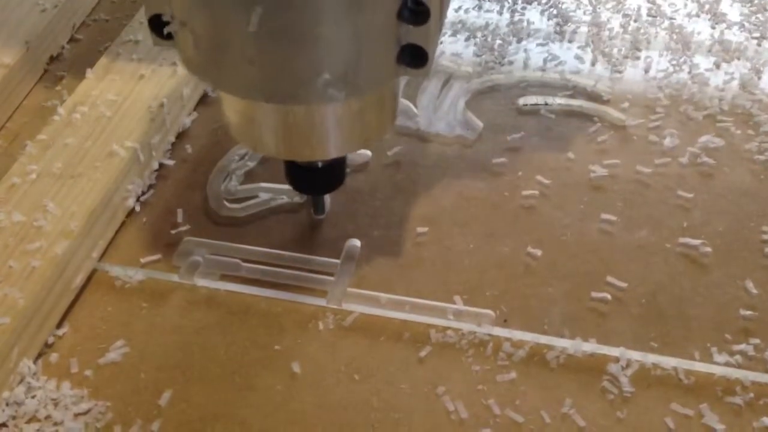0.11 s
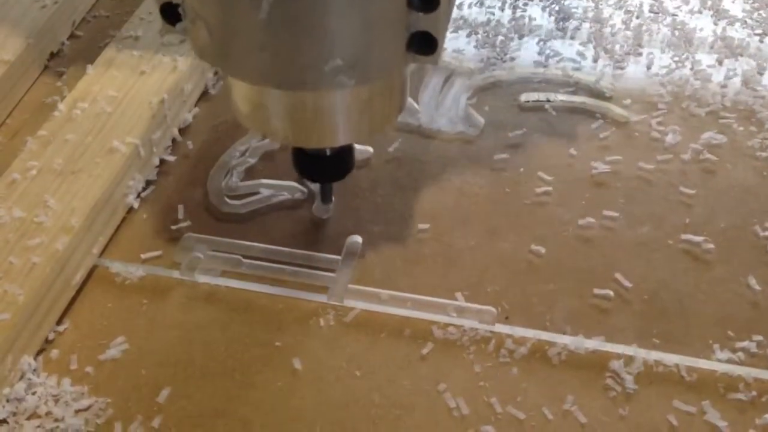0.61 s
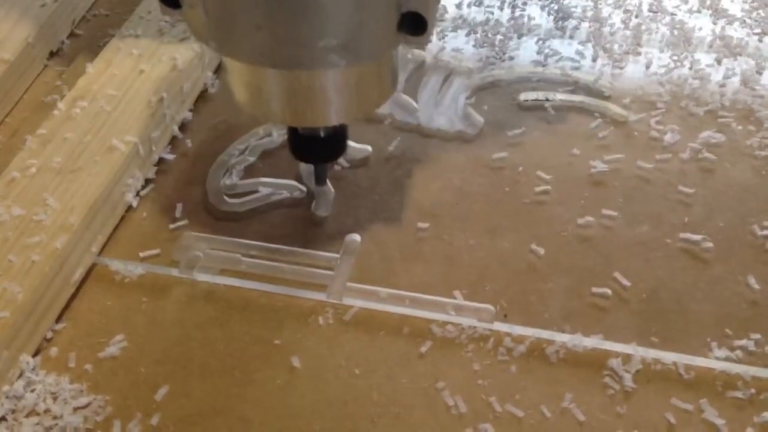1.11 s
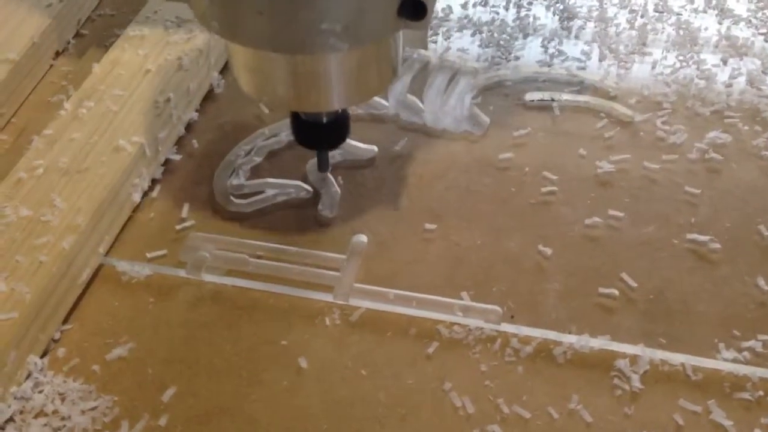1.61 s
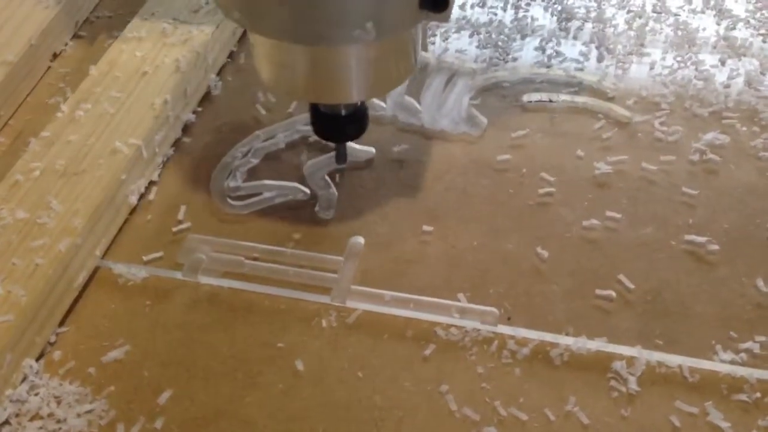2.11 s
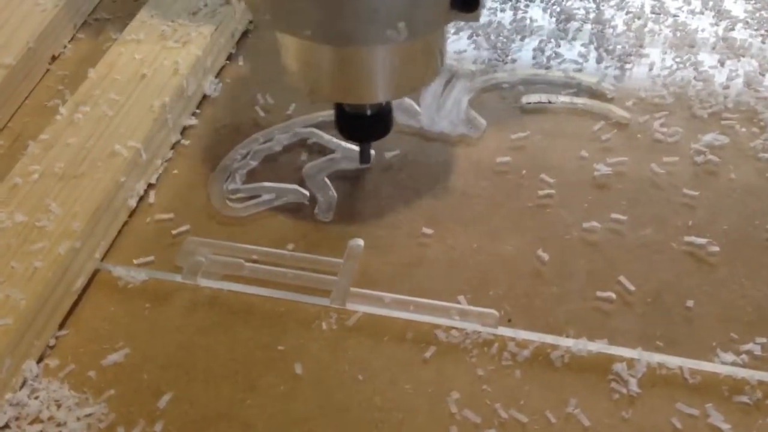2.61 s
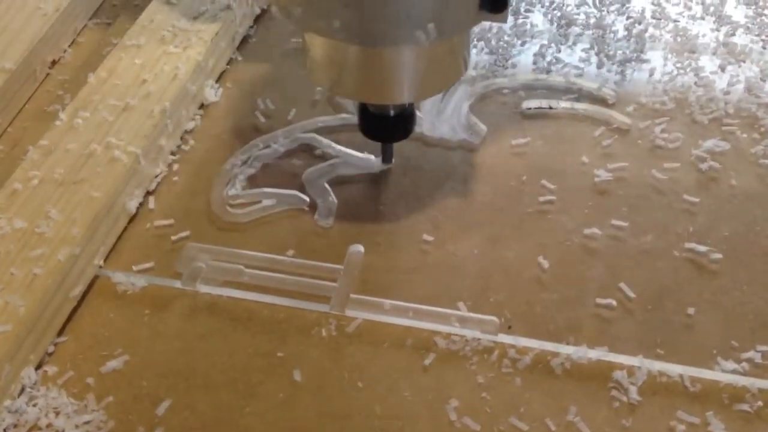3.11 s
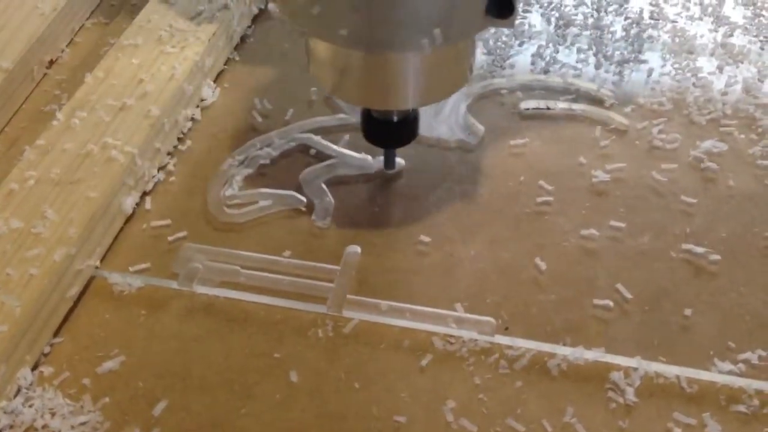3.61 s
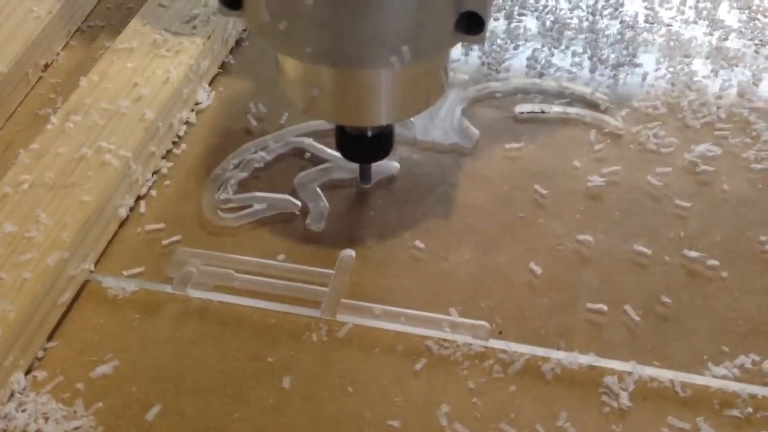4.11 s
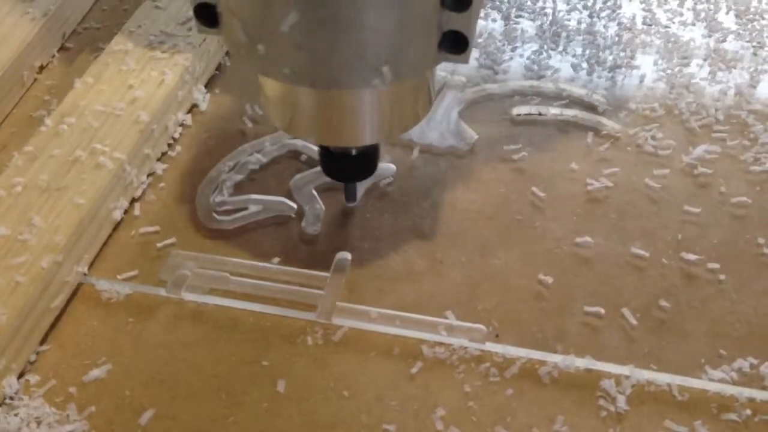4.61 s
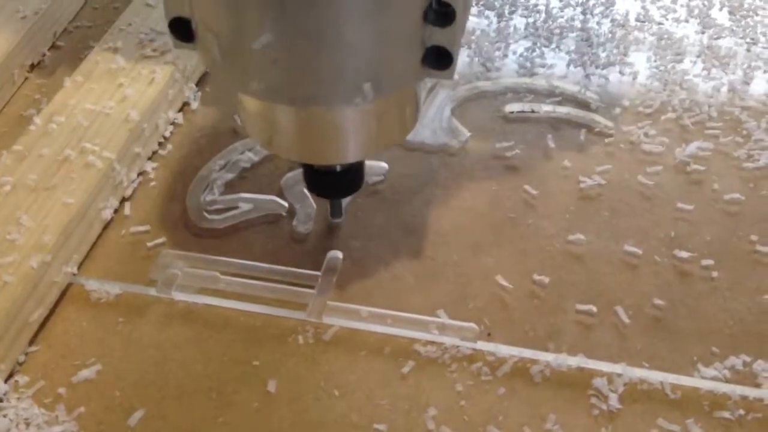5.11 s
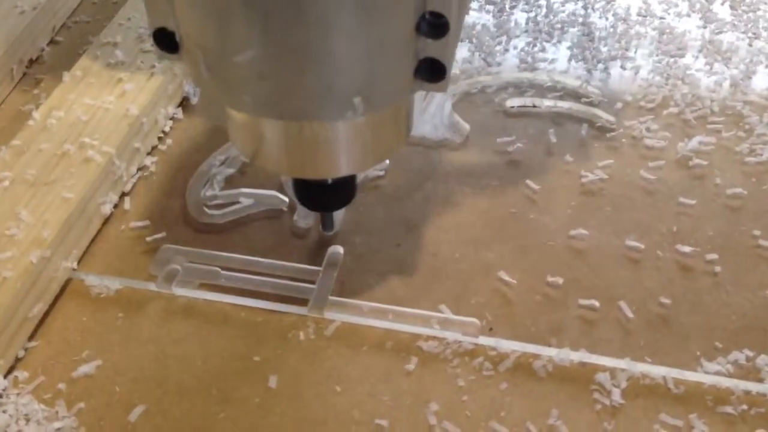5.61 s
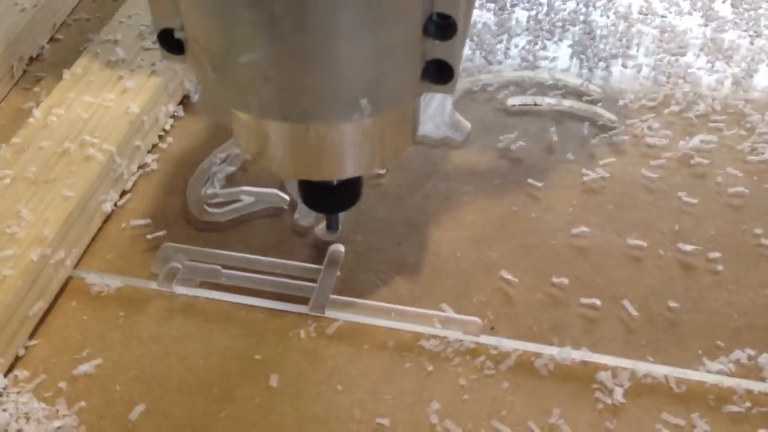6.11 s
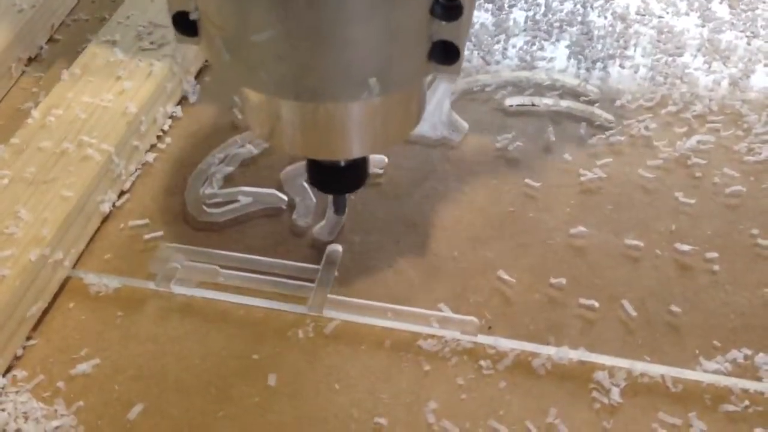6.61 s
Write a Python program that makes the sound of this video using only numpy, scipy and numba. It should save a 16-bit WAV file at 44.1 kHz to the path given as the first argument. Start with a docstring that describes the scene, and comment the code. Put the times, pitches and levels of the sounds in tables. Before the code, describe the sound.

Continuous shrill milling of plastic: a fast spindle's hard metallic squeal with hissing chips and a low hum, alternating between clean tone and raspy chatter.

```python
"""Router milling plastic sheet

A spindle near 18000 rpm cuts a groove close to a small microphone. A steady cut repeats every turn and
rings the cutter at whole multiples of the spindle speed; on curves the cutter chatters at its own pitch.
A slow feed makes the gantry throb for a while; chips and cooling air hiss over hum and table rumble."""
import sys
import numpy as np
from scipy import signal
from scipy.fft import rfft, irfft, next_fast_len
from scipy.io import wavfile
from scipy.ndimage import uniform_filter1d
from numba import njit

SR = 44100
rng = np.random.default_rng(int(sys.argv[2]) if len(sys.argv) > 2 else 0)


def gain_from_db(level_db):
    """Convert decibel levels to linear amplitude factors (20 dB per decade)."""
    decades = np.asarray(level_db, float) / 20
    return 10 ** decades


def pcm_store(signal):
    """Save signal as 16-bit PCM."""
    levels = np.round(np.clip(np.atleast_2d(signal), -1, 1) * 32767)
    wavfile.write(sys.argv[1], SR, levels.astype(np.int16).T)


N = 297675
T = np.arange(N) / SR
STEP = 64  # samples per tick of the coarse clock
SLOW = T[::STEP]
WHINE_BAND_HZ, CHIP_BAND_HZ = (5000, 7500), (8000, 15000)

# multiples of the turn: multiple, relative level/dB on feed headings 0, 1, 2, 3
ORDERS = [(4, -44, -38, -39, -39), (5, -36, -33, -37, -30), (6, -42, -36, -38, -37),
          (7, -44, -36, -38, -39), (8, -48, -37, -42, -40), (9, -42, -37, -44, -39),
          (10, -42, -45, -40, -37), (11, -43, -39, -44, -38), (12, -44, -36, -43, -50),
          (13, -38, -37, -39, -34), (14, -47, -44, -44, -46), (15, -44, -46, -48, -43),
          (16, -35, -36, -39, -35), (17, -30, -37, -45, -29), (18, -34, -27, -37, -35),
          (19, -28, -24, -29, -28), (20, -19, -19, -22, -21), (21, -28, -40, -32, -30),
          (22, -32, -22, -29, -29), (23, -49, -28, -39, -31), (24, -54, -38, -47, -42)]
# stretches of tool path: start t/s, feed heading 0-3, slip of the whine off the multiples f/Hz,
# hunting swing of the slip f/Hz, repeat index (rescaled to a share in scene)
STRETCHES = [(0, 2, -75, 15, .55), (.27, 2, 15, 20, .6), (.38, 0, 13, 0, .84), (.6, 0, 1, 0, .88),
             (1.58, 0, -53, 5, .82), (1.76, 1, 0, 0, .86), (2.03, 1, 0, 0, .92), (2.66, 1, 0, 0, .8),
             (2.95, 2, -95, 10, .68), (3.16, 2, -40, 15, .72), (3.29, 2, -78, 18, .6),
             (3.52, 2, 25, 15, .4), (3.63, 2, -10, 28, .5), (4.09, 2, -48, 25, .5), (4.36, 2, -80, 22, .55),
             (4.69, 2, -58, 18, .57), (4.96, 2, -60, 35, .48), (5.55, 2, -75, 30, .5),
             (5.885, 3, 56, 0, .82), (5.95, 3, 25, 0, .72), (6.02, 3, -30, 10, .55), (6.1, 3, 0, 0, .82)]


def columns(table):
    """Columns of a time table on the sample clock."""
    s, *cols = np.transpose(table)
    return [np.interp(T, s, c) for c in cols]


def unit(x):
    """Scale to rms 1."""
    return x / np.sqrt(np.mean(np.abs(x) ** 2))


def bandpassed(x, order, band_hz):
    """Butterworth band-pass."""
    return signal.sosfilt(signal.butter(order, band_hz, "bandpass", fs=SR, output="sos"), x)


def coloured(points):
    """Noise of rms 1 with the given spectrum, silent outside it."""
    hz, db = np.transpose(points)
    size = next_fast_len(N)
    f_hz = np.arange(size // 2 + 1) * SR / size + 1e-9
    gain = gain_from_db(np.interp(np.log(f_hz), np.log(hz), db, left=-200, right=-200))
    return unit(irfft(rfft(rng.standard_normal(size)) * gain, size)[:N])


def wander(hz, count=1):
    """Low-passed noise of spread 1 on the coarse clock, changing about hz times a second."""
    low = signal.butter(2, min(hz, SR / STEP * .45), fs=SR / STEP, output="sos")
    noise = rng.standard_normal((count, len(SLOW) + 400))
    x = signal.sosfilt(low, noise)[:, 400:]  # drop the filter's start
    return x / x.std(axis=1, keepdims=True)


def fine(x):
    """From the coarse clock to the sample clock."""
    return np.interp(T, SLOW, x)


def bell(s, half_s):
    """Gaussian bump of height 1 on the coarse clock."""
    return np.exp(-.5 * ((SLOW - s) / half_s) ** 2)


def evened(x, band_hz, window_s=0.12):
    """Hold the short-term level of x in a band near rms 1, so that a curve can play it."""
    power = bandpassed(x, 2, band_hz) ** 2
    size = int(window_s * SR)
    return x / np.sqrt(uniform_filter1d(uniform_filter1d(power, size), size) + 1e-12)


def held(values, glide_s):
    """One value per stretch of path, gliding into the next, on the coarse clock."""
    at = np.searchsorted(np.array(STRETCHES)[:, 0], SLOW, side="right") - 1
    return uniform_filter1d(np.asarray(values, float)[at], max(int(glide_s * SR / STEP), 1))


def by_heading(db):
    """A level given for the four feed headings, along the path, on the coarse clock."""
    return np.interp(held(np.array(STRETCHES)[:, 1], glide_s=0.067), range(4), db)


def path():
    """Slip, repeat index and looseness: held along a stretch; in chatter the slip jumps between pitches."""
    turn_in_s = 0.019
    _, _, slip_hz, hunt_hz, repeat = np.transpose(STRETCHES)
    hunt_hz = held(hunt_hz, turn_in_s)
    chance = wander(10.7, count=2)
    loose = np.tanh(hunt_hz / 10)
    slip_hz = held(slip_hz, turn_in_s) + hunt_hz * np.tanh(3.14 * chance[0])
    repeat = held(repeat, turn_in_s) + 0.14 * loose * chance[1]
    return fine(slip_hz), fine(repeat), loose


def throb():
    """The gantry shudders: phase, depth scale in dB, and a level swing shaped by three harmonics."""
    # t/s, throbs counted so far, depth scale/dB
    throbs = [(.4, -.22, 2.5), (.5, 2.79, 1.5), (.65, 6.81, 5.5), (.85, 12.04, 6.5), (1.05, 17.38, 6),
              (1.25, 22.87, 7), (1.45, 28.15, 7.5), (1.55, 30.96, 7.5), (1.75, 36.32, 3),
              (1.83, 38.6, -0.5), (1.95, 41.9, 2)]
    count, depth_db = columns(throbs)
    phase = 2 * np.pi * count
    depth_db = depth_db * (T > throbs[0][0]) * (T < throbs[-1][0])
    shape = np.cos(phase) - .2 * np.sin(2 * phase) - .27 * np.cos(2 * phase) - .1 * np.cos(3 * phase)
    return phase, depth_db, depth_db * (shape - .2)


@njit
def stack(turn, slip, gain, first, step):
    """Sum of neighbouring multiples of the turn, all shifted by the slip phase, with gliding complex gains."""
    y = np.empty(len(turn))
    for i in range(len(turn)):
        j = min(i // step, gain.shape[0] - 2)
        w = i / step - j
        spin = np.exp(1j * turn[i])
        z, total = np.exp(1j * (first * turn[i] + slip[i])), 0.
        for k in range(gain.shape[1]):
            total += (z * (gain[j, k] + w * (gain[j + 1, k] - gain[j, k]))).real
            z *= spin
        y[i] = total
    return y


def orders(turn, slip, rows, drift_db, drift_hz, blur, blur_hz, scatter, tremble):
    """Tones a turn apart; each drifts and trembles. Little phase scatter gathers them into a knock a turn."""
    count = len(rows)
    level_db = np.array([by_heading(row[1:]) for row in rows])
    level_db = level_db + drift_db * wander(drift_hz, count)
    shake = blur * tremble * (wander(blur_hz, count) + 1j * wander(blur_hz, count))
    phase = scatter * tremble ** 2 * wander(1.41, count)
    gain = gain_from_db(level_db) * (1 + shake) * np.exp(1j * phase)
    return stack(turn, slip, np.ascontiguousarray(gain.T), np.round(rows[0, 0]), STEP)


def shaken(angle, phase, upper, lower):
    """A tone, rms 1 before its side tones; the shudder splits one off above and one below."""
    angle = angle + 0.35 * fine(wander(8.3)[0])
    return np.sqrt(2) * (np.cos(angle) + upper * np.cos(angle + phase) + lower * np.cos(angle - phase))


def table_rumble():
    """The table rumbles: low noise whose level wanders."""
    # f/Hz, relative level/dB
    spectrum = [(40, -40), (80, -37), (110, -28), (135, -5), (165, 1), (200, 3), (240, -4.5), (270, -5)]
    # t/s, level before wander/dB
    table_level = [(0, -52), (1, -50), (1.6, -55.5), (3, -57.5), (3.9, -58.5), (4.1, -50.5), (5.5, -51.5),
                   (6.2, -51.5), (6.75, -47.5)]
    level_db, = columns(table_level)
    level_db = level_db + 2.1 * fine(wander(4.)[0]) + 1.4 * fine(wander(15.0)[0])
    return gain_from_db(level_db) * coloured(spectrum)


def cooling_air(turn):
    """Air and scraping between the tones: noise swelling slightly once a turn."""
    # f/Hz, relative level/dB
    spectrum = [(300, -73), (450, -75), (750, -68), (1050, -65.5), (1450, -60.5), (1900, -66.5),
                (2600, -68.5), (3500, -64), (4700, -68.5), (5400, -66)]
    return coloured(spectrum) * gain_from_db(0.46 * np.cos(turn + 3.8) + 0.84 * fine(wander(11.6)[0]))


def sheet_drone(turn, steady, tremble, drone_db, swing_db):
    """The sheet drones at multiples 4-16 of the turn; a less steady cut trades tones for air noise."""
    low = np.array(ORDERS, float)[:13]
    tones = evened(orders(turn, 0 * turn, low, 3.04, 2.56, 0.31, 23.0, 2.48, tremble), (700, 4700), 0.16)
    mix = gain_from_db(-3.0 + 1.56 * steady) * tones + gain_from_db(-2.0 - 4.2 * steady) * cooling_air(turn)
    return gain_from_db(drone_db + 0.33 * swing_db) * mix


def runout_hum(turn, phase, depth_db):
    """Once-a-turn hum that swells over a faint floor."""
    # t/s, peak level/dB, half length/s
    swells = [(.21, -48.5, 0.14), (0.633, -49, 0.042), (1.093, -50, 0.21), (1.502, -52, 0.082),
              (1.85, -42.5, 0.048), (2.152, -38, 0.096), (2.36, -47.5, .08), (2.544, -36.5, 0.044),
              (2.71, -38, 0.046), (2.95, -49.5, 0.11), (3.22, -46.5, 0.075), (3.398, -42.5, 0.049),
              (3.576, -45, 0.051), (3.71, -45.5, .03), (4.037, -39.5, 0.033), (4.23, -50, 0.033),
              (4.352, -48, 0.025), (4.525, -36.5, 0.037), (4.702, -34.5, 0.018), (4.82, -45.5, 0.056),
              (5.034, -34, 0.028), (5.254, -42, 0.059), (5.38, -43, .03), (5.543, -34.5, 0.03),
              (5.733, -43, .05), (5.917, -41, 0.037), (6.042, -42, 0.014), (6.386, -45.5, 0.078),
              (6.71, -57, 0.044)]
    level = gain_from_db(-65) + sum(gain_from_db(db) * bell(s, half_s) for s, db, half_s in swells)
    return fine(level) * shaken(turn, phase, 0.32 * depth_db, 0.11 * depth_db)


def flute_hum(turn, phase, depth_db, hum_db, drone_db):
    """Twice-a-turn flute hum, and a third multiple that follows the drone and swells as the path bends."""
    # t/s, lift/dB, half length/s
    bends = [(.3, 6, 0.045), (0.635, 4, .05), (1.97, 8, .08), (2.52, 4, 0.042), (2.897, 9, 0.056),
             (3.58, 8.5, 0.044), (4.02, 5.5, 0.048), (5.548, 3, 0.054), (5.924, 5, 0.042)]
    hum_db = hum_db + 0.81 * fine(wander(6.4)[0])
    third_db = fine(by_heading((-38, -46.5, -40, -36.5)))  # at a drone of -26 dB
    third_db = third_db + 1.05 * (drone_db + 26)
    third_db = third_db + fine(1.8 * wander(4.3)[0] + sum(db * bell(s, half_s) for s, db, half_s in bends))
    second = gain_from_db(hum_db) * shaken(2 * turn, phase, .08 * depth_db, .17 * depth_db)
    third = gain_from_db(third_db) * shaken(3 * turn, phase, 0.057 * depth_db, 0.013 * depth_db)
    return second + third


def ticks(phase, depth_db):
    """A short spray of chips near the top of each throb: gated treble noise."""
    spray = unit(bandpassed(rng.standard_normal(N), 2, (9000, 12900)))
    gate = np.exp((np.cos(phase - .3) - 1) / .15)
    return gain_from_db(-30.5) * depth_db / 6 * gate * spray


def flying_chips(turn, steady, tremble, chips_db, swing_db, whine):
    """Chips fly in bursts once a turn, louder as the whine swells; a steady cut turns hiss into tones."""
    # multiple of the turn, relative level/dB (same on every heading)
    treble = [(25, -40), (28, -45), (33, -49), (38, -50), (43, -47), (45, -51), (48, -53), (49, -58)]
    # f/Hz, relative level/dB
    spectrum = [(4500, -113), (5500, -62.5), (7500, -66.5), (9000, -68.5), (11000, -69.5), (13000, -70.5),
                (14500, -75.5), (15300, -77)]
    top = np.array([(k, *[np.interp(k, *np.transpose(treble))] * 4) for k in range(25, 50)])
    swell = evened(whine, WHINE_BAND_HZ, 0.69) ** 2 + 1e-9
    swell = uniform_filter1d(swell, size=180) ** 0.14 * gain_from_db(0.15 * swing_db)
    gate = gain_from_db(3.5 * np.cos(turn + 1.2) + 2.4 * fine(wander(250.)[0]))
    tones = evened(orders(turn, 0 * turn, top, 2.5, 4.9, 0.64, 34.0, 0.57, tremble), CHIP_BAND_HZ)
    hiss = evened(coloured(spectrum) * gate, CHIP_BAND_HZ)
    return gain_from_db(chips_db) * swell * (np.sqrt(steady) * tones + np.sqrt(1 - steady) * hiss)


def ring(x):
    """Cutter and collet resonances, falling off outside their range."""
    # f/Hz, width f/Hz, relative level/dB
    resonances = [(5150, 1100, -18), (5858, 260, 0.5), (6280, 210, 5), (6700, 1200, -26.5), (6690, 260, 0),
                  (7530, 1200, -6)]
    x = bandpassed(x, 1, (5000, 7600))
    return sum(gain_from_db(db) * signal.lfilter(*signal.iirpeak(hz, hz / width_hz, fs=SR), x)
               for hz, width_hz, db in resonances)


def chatter(turn, steady):
    """What does not repeat from turn to turn: loose squeals chopped by the flutes, and scraping."""
    # flute engagement around a turn: multiple, depth, phase/rad
    flutes = [(1, 0.5, -0.5), (2, 0.67, 3.5), (3, 0.68, 2), (4, 0.56, 1.5)]
    squeal = 0
    for hz, db, width_hz in [(6032, -3.5, 53), (5880, -12.0, 33), (5780, -7.5, 19), (6015, -8.5, 31)]:
        a, b = wander(width_hz, count=2)
        tone = fine(a) * np.cos(2 * np.pi * hz * T) + fine(b) * np.sin(2 * np.pi * hz * T)
        squeal = squeal + gain_from_db(db) * tone
    bite = 1 + sum(depth * np.cos(k * turn + rad) for k, depth, rad in flutes)
    scrape = gain_from_db(6.0 - 10 * steady) * rng.standard_normal(N) * (1 + .5 * np.cos(turn))
    return ring(squeal * bite + scrape)


def bites(loose):
    """Quick whine swings in dB: grabs each followed by a skip, lulls, and restlessness that grows in chatter."""
    # the cutter grabs, then skips: t/s, lift/dB
    grab_table = [(.213, 4.5), (0.292, 10), (0.331, 7), (2.993, 5.5), (3.077, 5), (3.197, 9.5),
                  (3.379, 5.5), (3.435, 6.5), (3.485, 8.5), (4.229, 0.5), (4.531, 3.5), (4.605, 4),
                  (4.658, 3), (4.775, 5.5), (5.159, 8.5), (5.578, 5), (5.696, 3), (5.766, 2.5), (5.853, 5),
                  (5.909, 4), (5.957, 3), (6.11, 8), (6.146, 6.5), (6.445, 9.5), (6.526, 6.5), (6.605, 5),
                  (6.705, 8.5), (6.748, 7.5)]
    # the whine drops out: t/s, drop/dB, half length/s
    lull_table = [(0.25, 3.5, 0.012), (2.787, 7.5, 0.01), (3.045, 9, 0.0075), (3.185, 11, .012),
                  (3.43, 4.5, .012), (3.794, 10, 0.0081), (3.97, 6, 0.016), (4.953, 8, 0.02),
                  (5.52, 7.5, 0.015), (5.671, 2.5, 0.012), (5.83, 5, 0.019), (5.886, 10, .012),
                  (6.045, 7.5, 0.024)]
    grabs = sum(db * (bell(s, 0.006) - 0.38 * bell(s + 0.02, 0.0065)) for s, db in grab_table)
    lulls = sum(db * bell(s, half_s) for s, db, half_s in lull_table)
    restless = 1.3 * (0.59 + loose) * wander(18)[0]
    return fine(grabs - lulls + restless)


def cutter_whine(turn, slip, repeat, steady, tremble, level_db, phase, depth_db):
    """The cutter whines at multiples 17-24 of the turn, shifted by the slip, mixed with chatter."""
    high = np.array(ORDERS, float)[13:]
    slip = slip + 0.11 * depth_db * np.cos(phase - 2)  # the throb sways the phase
    cut = evened(orders(turn, slip, high, 0.66, 3.8, 0.073, 51.0, 1.22, tremble), WHINE_BAND_HZ)
    loose_cut = evened(chatter(turn, steady), WHINE_BAND_HZ, 0.034)
    return gain_from_db(level_db) * (np.sqrt(repeat) * cut + np.sqrt(1 - repeat) * loose_cut)


def scene():
    """Whine and chips share the cut's swings; the drone follows the throb less."""
    # t/s, spindle speed f/Hz
    spindle = [(0, 303.9), (.27, 305.2), (.54, 305.5), (.8, 304.6), (1.0, 305.5), (1.17, 304.6),
               (1.35, 305.0), (1.55, 303.9), (1.85, 304.7), (2.16, 304.3), (2.52, 305.1), (2.74, 304.2),
               (2.9, 304.5), (3.15, 304.0), (3.42, 304.2), (3.57, 305.0), (3.95, 304.4), (4.05, 303.6),
               (4.3, 304.5), (5.8, 304.3), (5.95, 305.3), (6.15, 305.7), (6.4, 304.2), (6.7, 305.0)]
    # effort of the cut, before swings and mixing: t/s, whine level/dB, sheet drone level/dB,
    # chip flow level/dB, twice-a-turn flute hum level/dB
    effort = [(0, -16.5, -26, -32.5, -36), (.2, -14.5, -26, -32.5, -35), (.37, -19.5, -24.5, -35, -30.5),
              (.44, -20, -24, -33.5, -44), (.65, -15, -24.5, -32.5, -41.5), (1.1, -15.5, -26, -29, -50),
              (1.5, -18, -28, -29.5, -50), (1.65, -18, -30, -27.5, -49), (1.76, -18, -29, -31, -38.5),
              (2.1, -13, -22.5, -26, -39), (2.35, -13.5, -24, -28, -39), (2.55, -13.5, -22.5, -28, -36),
              (2.74, -15.5, -26, -31.5, -37), (2.9, -15.5, -25, -29, -33), (3.3, -13.5, -27, -32.5, -33.5),
              (3.55, -21, -27.5, -31, -33), (3.75, -19.5, -25, -28, -34.5), (4.04, -14.5, -23, -27.5, -36),
              (4.16, -18.5, -28, -31, -43), (4.35, -15, -26.5, -27, -33.5),
              (4.88, -13.5, -25, -30.5, -33.5), (5.25, -18.5, -27, -33.5, -33.5),
              (5.55, -14, -25, -33.5, -30.5), (5.62, -17.5, -27, -33, -38), (5.9, -14.5, -25, -34, -32),
              (6.25, -22.5, -24, -31.5, -37), (6.5, -16.5, -22, -29, -33.5),
              (6.75, -17.5, -21.5, -30.5, -32)]
    speed_hz, = columns(spindle)
    whine_db, drone_db, chips_db, hum_db = columns(effort)
    slip_hz, repeat, loose = path()
    repeat = np.clip(1.052 * repeat - .2, 0, .95)
    # a steady cut repeats without slipping
    steady = np.clip(1.22 * repeat - np.abs(slip_hz) / 40, 0, .95) ** 3.7
    tremble = 1 - 0.32 * steady[::STEP]
    turn, slip = (2 * np.pi * np.cumsum(hz) / SR for hz in (speed_hz, slip_hz))
    phase, depth_db, swing_db = throb()

    whine_db = whine_db + bites(loose) + swing_db
    whine = cutter_whine(turn, slip, repeat, steady, tremble, whine_db, phase, depth_db)
    mix = table_rumble() + sheet_drone(turn, steady, tremble, drone_db, swing_db)
    mix = mix + runout_hum(turn, phase, depth_db) + flute_hum(turn, phase, depth_db, hum_db, drone_db)
    mix = mix + ticks(phase, depth_db) + flying_chips(turn, steady, tremble, chips_db, swing_db, whine)
    return (mix + whine)[None]


def band_limit(x):
    """A steep low-pass at the top of the band."""
    return signal.sosfilt(signal.butter(12, 15290, fs=SR, output="sos"), x)


def record(dry):
    """The microphone rounds the peaks and cuts the deep bass and the top."""
    soft = np.tanh(1.3 * dry) / 1.3
    soft = signal.sosfilt(signal.butter(3, 85, "highpass", fs=SR, output="sos"), soft)
    mix = signal.sosfilt(signal.ellip(8, .2, 60, 15250, fs=SR, output="sos"), soft)
    return band_limit(mix)


dry = scene()
out = record(dry)
pcm_store(out)
```